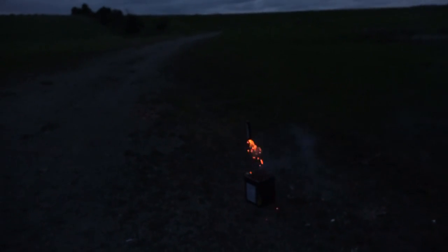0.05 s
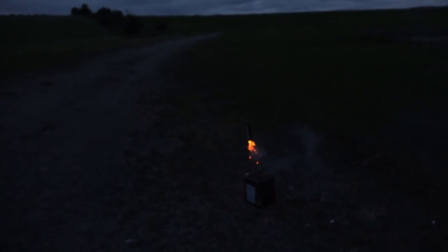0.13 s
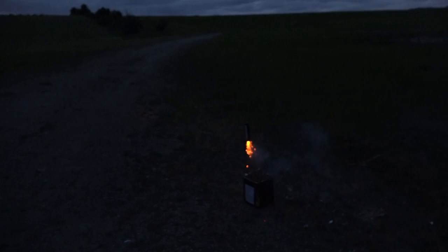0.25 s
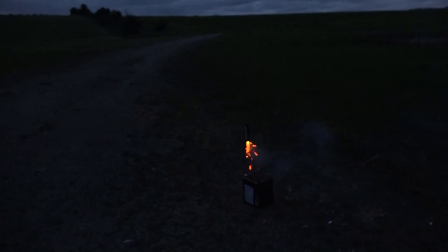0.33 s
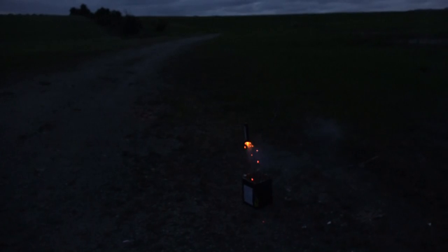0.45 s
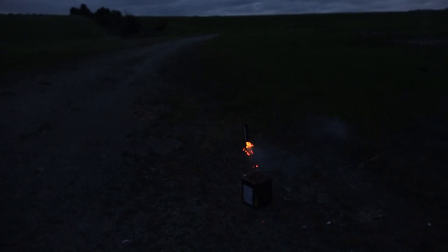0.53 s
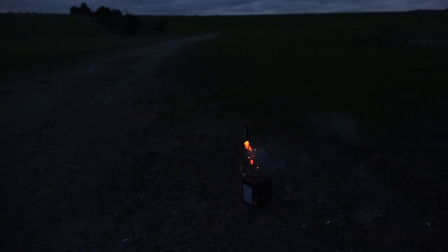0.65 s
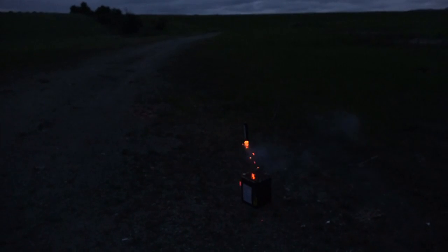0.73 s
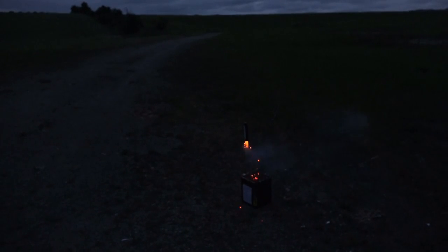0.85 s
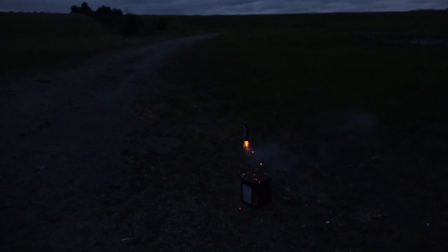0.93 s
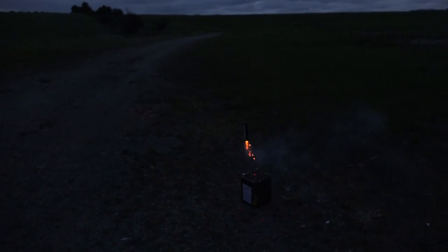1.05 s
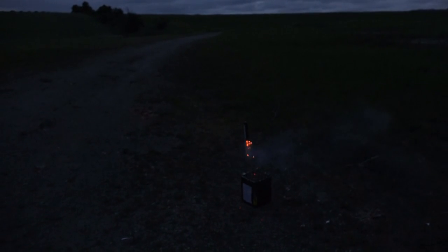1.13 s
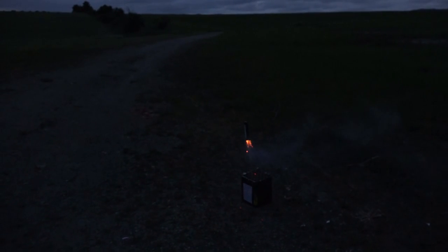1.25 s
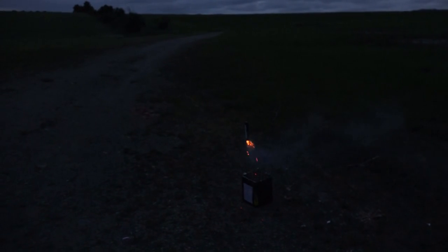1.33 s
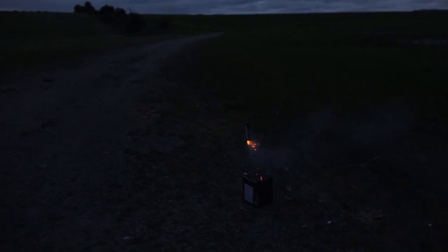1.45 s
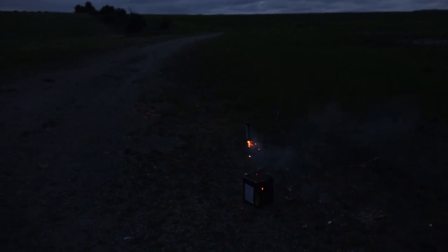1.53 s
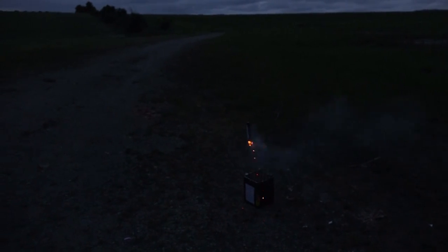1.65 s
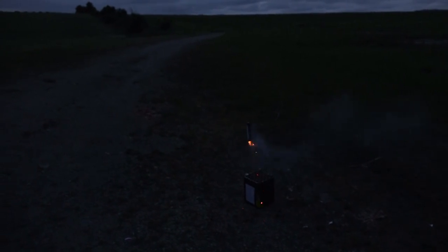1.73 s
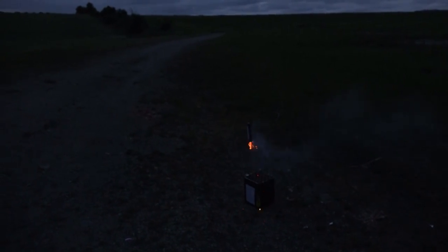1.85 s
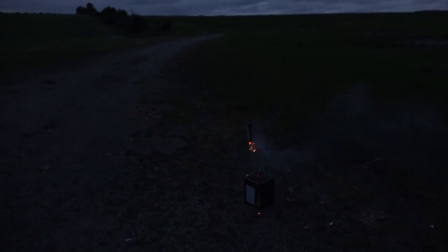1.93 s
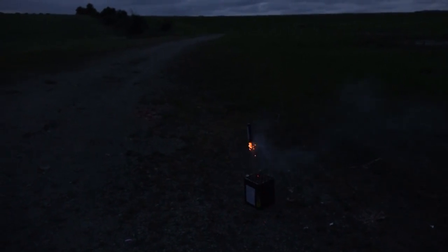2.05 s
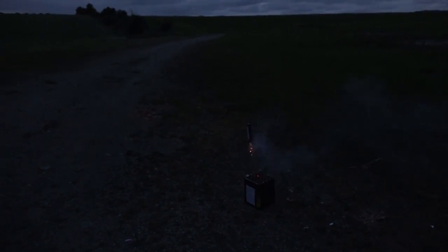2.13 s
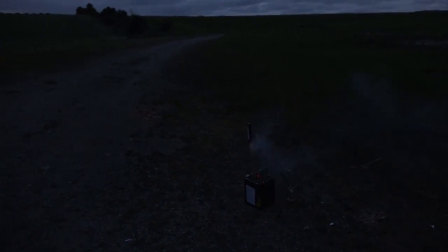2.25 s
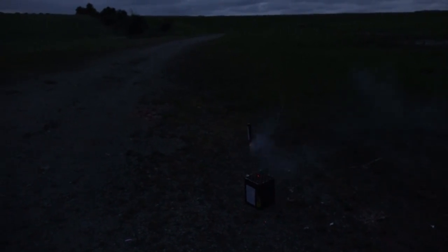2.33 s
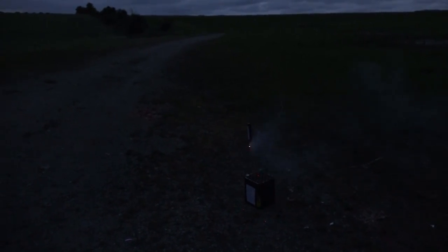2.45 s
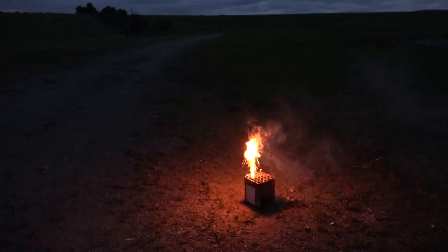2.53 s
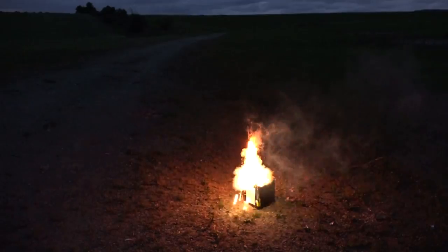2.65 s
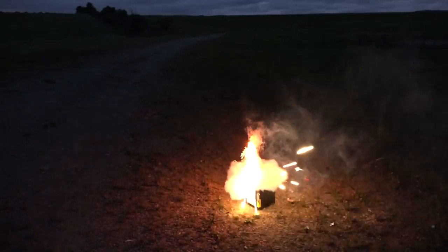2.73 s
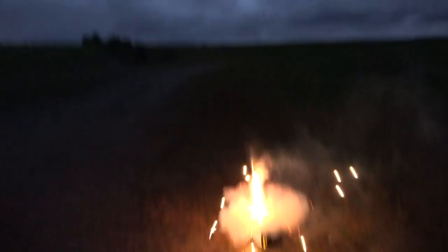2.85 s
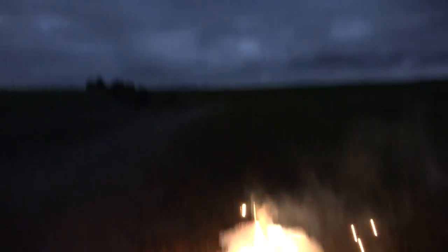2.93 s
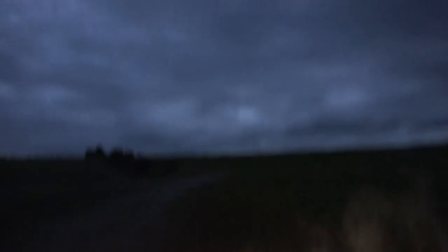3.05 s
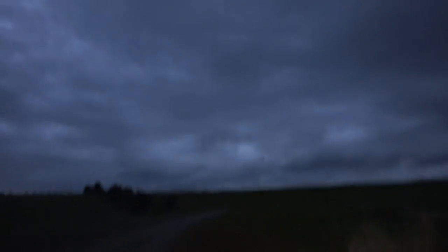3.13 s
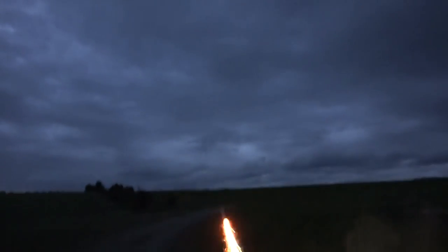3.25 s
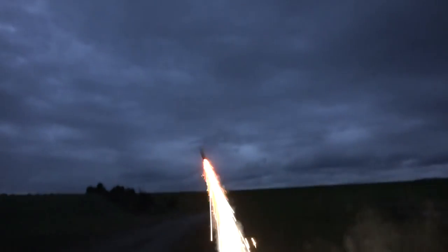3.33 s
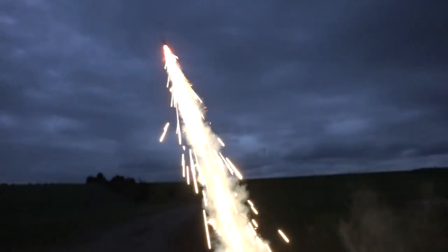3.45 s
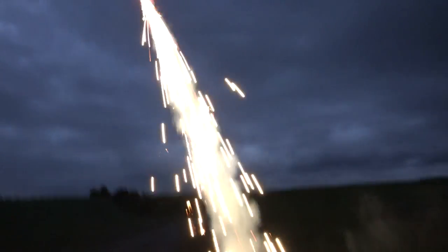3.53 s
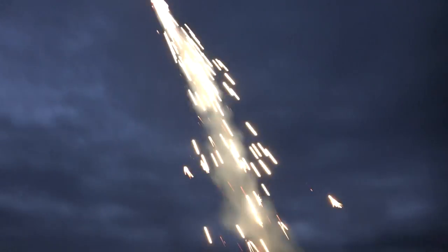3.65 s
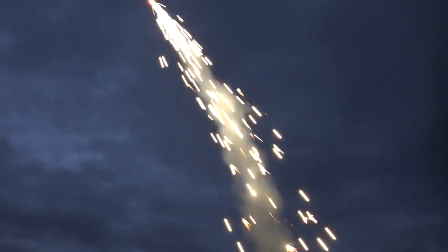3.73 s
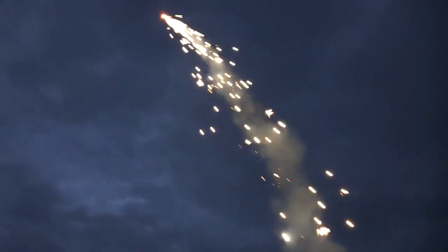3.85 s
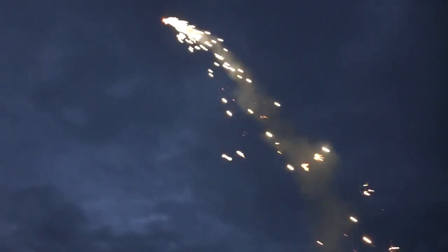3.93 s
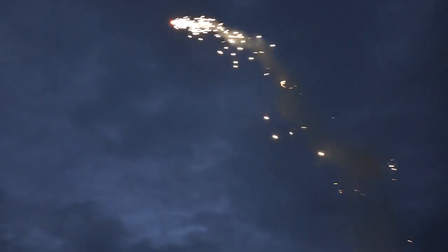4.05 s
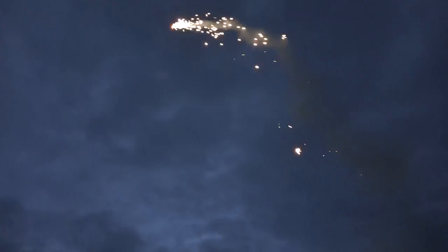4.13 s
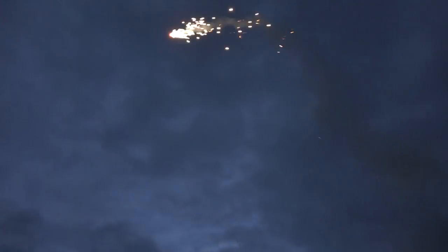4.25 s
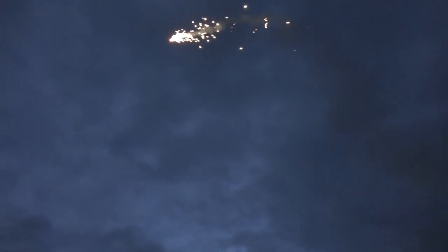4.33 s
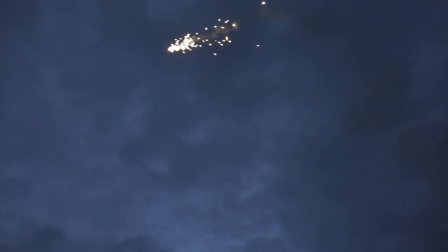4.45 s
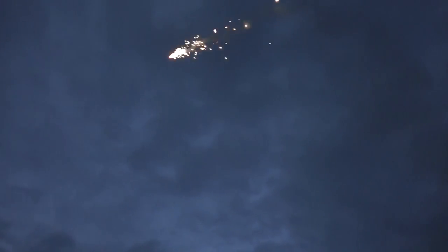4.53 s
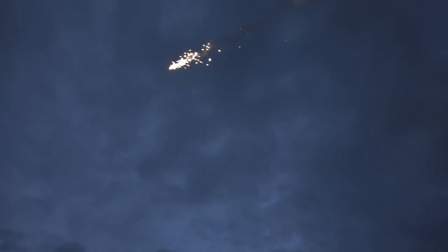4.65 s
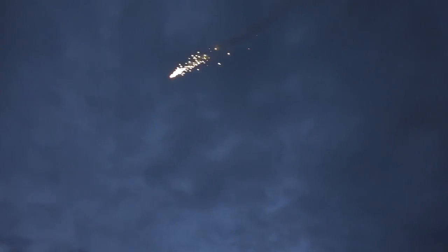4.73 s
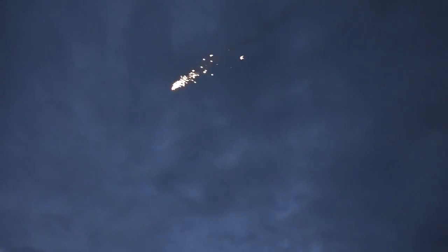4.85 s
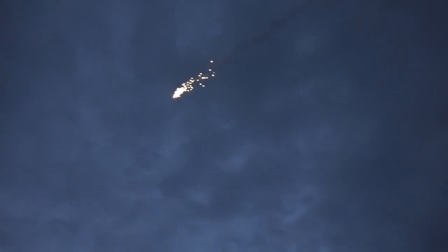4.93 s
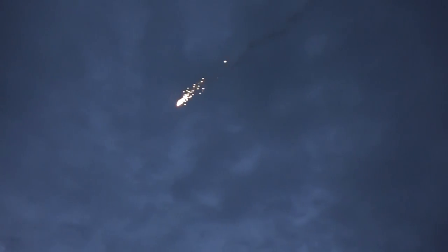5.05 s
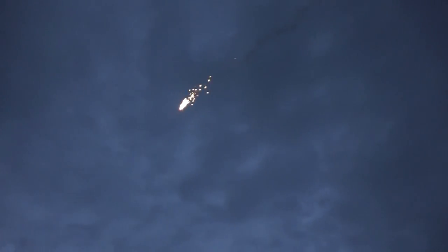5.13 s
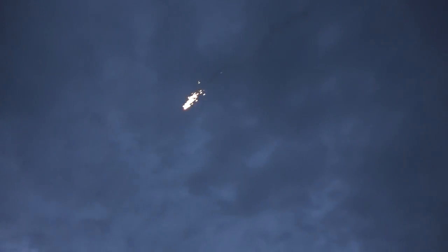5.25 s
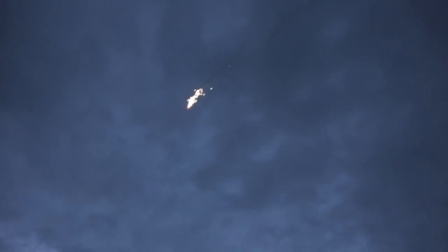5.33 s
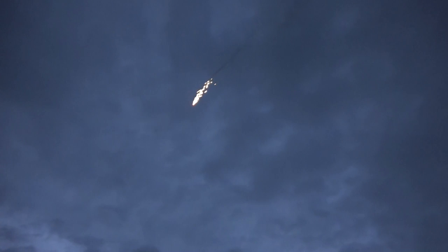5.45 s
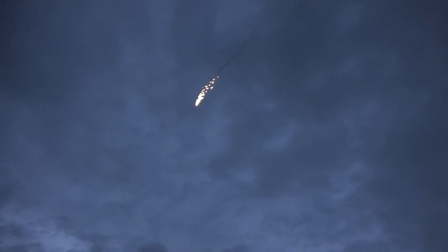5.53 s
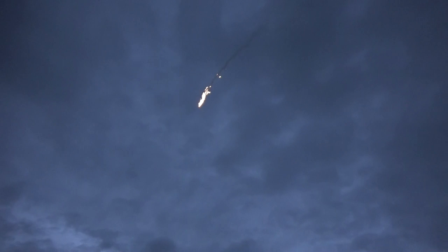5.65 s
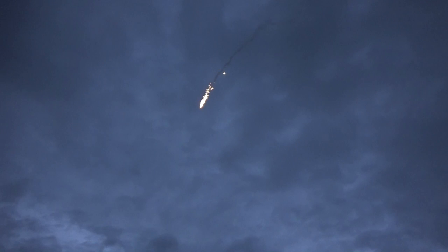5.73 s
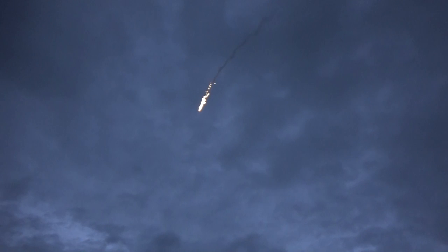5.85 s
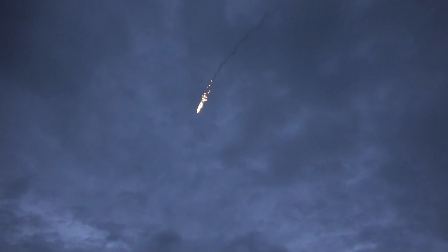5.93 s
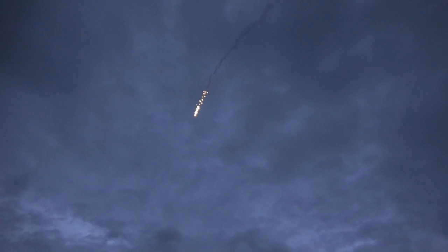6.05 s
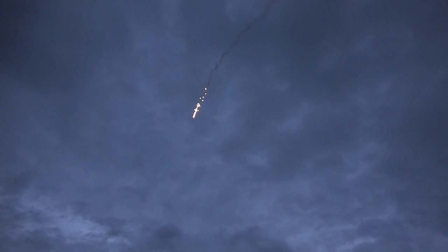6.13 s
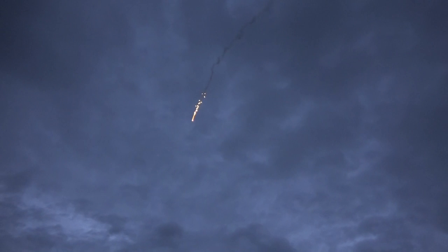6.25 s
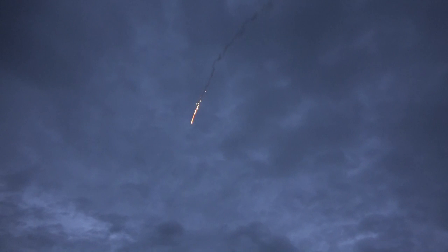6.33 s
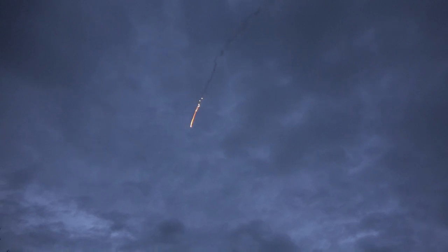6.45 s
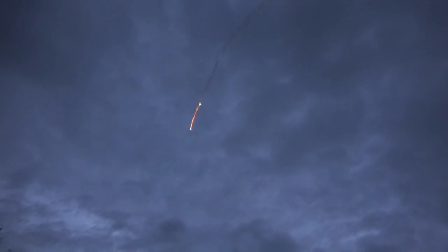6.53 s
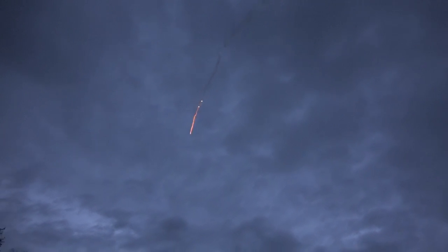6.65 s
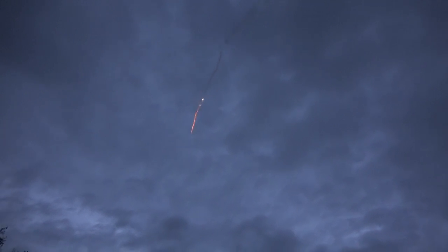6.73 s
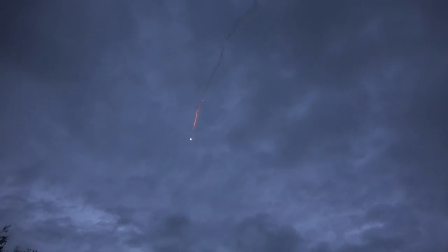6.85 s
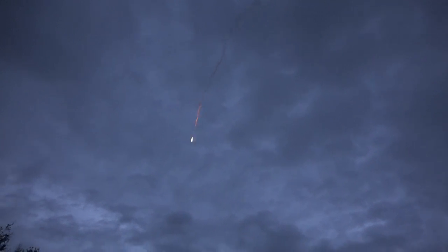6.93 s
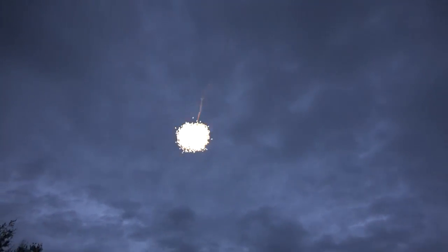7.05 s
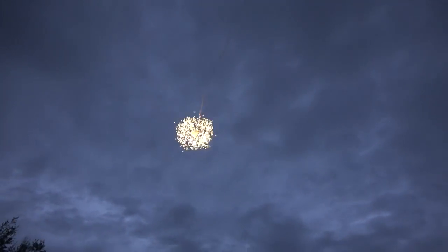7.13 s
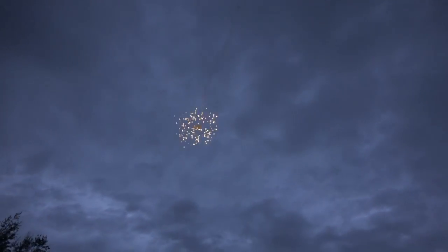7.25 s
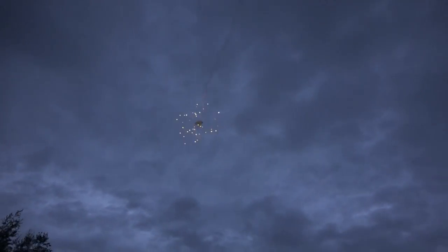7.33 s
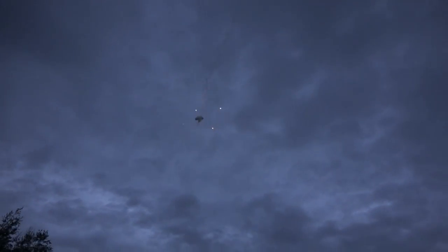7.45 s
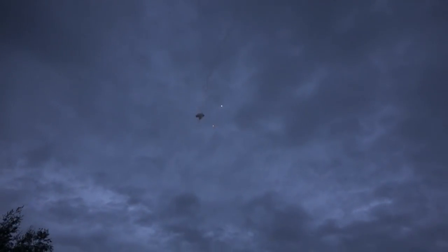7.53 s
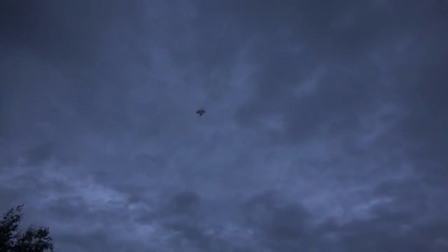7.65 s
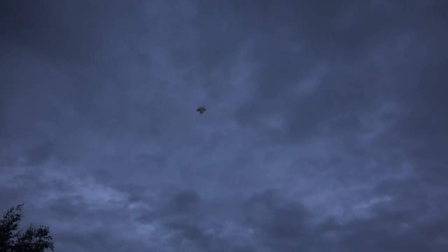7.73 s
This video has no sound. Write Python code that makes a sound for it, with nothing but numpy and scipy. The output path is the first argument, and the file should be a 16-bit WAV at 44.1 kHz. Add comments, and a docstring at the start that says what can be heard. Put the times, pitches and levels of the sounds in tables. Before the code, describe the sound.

From 0 to 2.5 s a nearby fuse hisses and sizzles softly, with small spits and thuds of sparks, over faint low outdoor rumble; it weakens after 1.6 s. At 2.5 s a small puff and a sharper pop ignite the motor, and a very loud, shrill whistle bursts in near 2.9 kHz. It stumbles and drops around 2.9 s as the rocket lifts off, then sinks from about 2.3 kHz to 1.5 kHz by 5.8 s, rasping, fluttering and occasionally cracking to lower notes, with a breathy roar, shifting ground reflection and tree echoes. The rasp dulls with distance. Near 6.2 s the whistle clears, hooks upward and stops. Faint echoes and open air fill the gap until 7.2 s, when a hard, overloading bang cracks, followed by quick echoes and a swelling boom and crash, fading to the end near 8 s.

```python
"""A fuse hisses, sizzles and spits over a quiet field: noise bands under slowly wandering envelopes.
Two gas puffs light the motor; a noisy oscillator whistles, its puffs rasp and filtered noise roars.
The rocket climbs, its ground reflection sweeps a comb, and trees return diffuse, decaying echoes.
The whistle sinks, breaks up at times and ends with an upward hook; then a shell bursts overhead,
as sharp pressure fronts followed by a swelling and slowly dying scatter of boom and crash."""
import sys
import numpy as np
from scipy import signal
from scipy.fft import rfft, irfft, next_fast_len
from scipy.io import wavfile
from scipy.ndimage import uniform_filter1d, map_coordinates

SR = 44100
rng = np.random.default_rng(int(sys.argv[2]) if len(sys.argv) > 2 else 0)


def log_audio(samples):
    """Write samples as a 16-bit WAV file to the path given in sys.argv[1]."""
    # one column per channel
    frames = np.atleast_2d(samples).T
    # limit to full scale, then quantise
    limited = np.clip(frames, -1, 1)
    pcm = np.round(limited * 32767).astype(np.int16)
    wavfile.write(sys.argv[1], SR, pcm)


N = 343980
TIME = np.arange(N) / SR

# Levels in the tables are relative: the stage that uses them may add its own gain.
# low rumble at the microphone: t/s, level/dB
RUMBLE_LEVEL = [(0, -58), (2.5, -57), (3.15, -65.5), (3.25, -50), (3.6, -75), (6.2, -61), (7, -57.5)]
# spectrum of the low rumble of the open air: f/Hz, level/dB
RUMBLE_SPECTRUM = [(12, -29), (20, 3.5), (65, -3.5), (92, 0.5), (123, -5), (230, -9.5), (400, -22),
                   (520, -45), (880, -120)]
# spectrum of the steady background air: f/Hz, level/dB
AIR_SPECTRUM = [(100, -3), (300, -3.5), (1000, -7.5), (3000, -6), (8000, -14.5), (16000, -40.5)]
# course of the fuse: t/s, hiss level/dB, sizzle level/dB
FUSE_LEVELS = [(0, -54, -55.5), (.75, -52.5, -57.5), (1.08, -58, -59), (1.46, -52, -50.5),
               (1.63, -59.5, -60.5), (1.95, -62, -58.5), (2.12, -67, -66.5), (2.5, -61.5, -67)]
# spectrum of the fuse's hiss: f/Hz, level/dB
HISS_SPECTRUM = [(150, -12.5), (600, -11.5), (1400, -8), (2100, -3.5), (2750, -0.5), (3400, -5),
                 (4200, -12.5), (8000, -14), (16000, -31)]
# spectrum of the fuse's sizzle and of the fizzing sparks: f/Hz, level/dB
SIZZLE_SPECTRUM = [(2500, -33.5), (4500, -17.5), (6700, -5), (8500, -3.5), (11000, -8.5), (16000, -7.5)]
# sparks spat by the fuse: t/s, thud level/dB, fizz level/dB
SPARKS = [(.067, -46, -55), (.414, -47, -51), (.534, -56, -49), (.764, -45, -61), (1.124, -47, -66),
          (1.851, -57, -57)]
# likeness of left and right for fuse, ignition and jet: f/Hz, likeness/1
LIKENESS = [(100, 0.95), (1000, 0.98), (2500, 1), (5000, 1), (8000, 0.7), (13000, 0.4)]
# answer of the near trees: f/Hz, T60/s, level/dB
NEAR_TREES_ANSWER = [(200.6, .6, -28), (1609, 0.63, 8), (2940, 0.99, 3.5), (4587, 0.8, 12),
                     (6960, 0.56, 16), (12000, 0.18, 23)]
# answer of the far trees: f/Hz, T60/s, level/dB
FAR_TREES_ANSWER = [(200, 4, -4), (1670, 41, -3), (3000, 2.1, -11), (4420, 2.1, 4), (9170, 1, 0.5)]
# puffs of gas as the motor catches: t/s, level/dB, T60/s, low-pass f/Hz
IGNITION_PUFFS = [(2.506, -28, 0.089, 1480), (2.574, -14, 0.027, 6370)]
# note of the tube, sinking as the fuel burns back, with a hook up at burnout: t/s, f/Hz
TUBE_PITCH = [(2.52, 2780), (2.58, 2930), (2.66, 2920), (2.76, 2845), (2.92, 2630), (2.928, 2450),
              (3.05, 2300), (3.2, 2170), (3.42, 2035), (3.65, 1850), (3.85, 1790), (4.3, 1750), (4.7, 1685),
              (5.2, 1635), (5.78, 1500), (6.16, 1560), (6.21, 1709)]
# state of the flame: t/s, roughness/1, share by which every second puff is weaker/1
FLAME_STATE = [(2.54, .8, .1), (2.62, .5, .1), (2.82, .16, .12), (2.91, .1, .7), (3.07, .36, .4),
               (3.75, .45, .8), (4.5, .48, .3), (5.2, .52, .15), (5.9, .65, .1), (6.03, .25, .12),
               (6.2, .08, .1)]
# the whistle jumps to a lower, rougher note: start t/s, length/s, share of the pitch lost/1
PITCH_SLIPS = [(3.834, 0.043, 0.038), (3.932, 0.027, 0.027), (4.295, 0.046, 0.029), (4.393, 0.081, 0.083),
               (4.527, .105, 0.074), (4.821, 0.13, .045), (5.453, .05, 0.029)]
# the flame stumbles and the whistle breaks up: start t/s, length/s, dip/dB
FLAME_STUMBLES = [(2.912, 0.11, 1.5), (5.003, 0.052, 7.5), (5.083, 0.026, 4), (5.251, .06, 5),
                  (5.351, 0.0797, 3.5), (5.696, 0.079, 3)]
# voices of the motor: t/s, whistle level/dB, rasp level/dB, roar level/dB
VOICE_LEVELS = [(2.58, -9.5, -22, -35), (2.67, -15, -25.5, -57), (2.9, -23.5, -25.5, -43),
                (2.96, -17.5, -21, -39.5), (3.15, -14, -24.5, -39), (3.44, -13.5, -21, -31.5),
                (3.65, -14, -24, -34.5), (4.15, -13, -23, -35.5), (4.5, -11.5, -24.5, -37.5),
                (4.85, -12.5, -21.5, -40), (5.1, -13.5, -26, -41), (6.0, -16.5, -26.5, -45)]
# spectrum of the rasping puffs: f/Hz, level/dB
PUFF_SPECTRUM = [(100, -41), (400, -17.5), (900, -19.5), (1600, -5), (2500, -3), (4000, -7.5), (5400, -4.5),
                 (7400, -1.5), (9000, -5.5), (12000, -7), (16000, -9.5)]
# resonances of the tube: centre/pitch, half-width/pitch, even-puff level/dB, alternating-puff level/dB
TUBE_RESONANCES = [(1.45, .08, -8, 14), (1.95, .09, -3.5, 8.5), (2.5, .08, 5, 1), (2.97, .14, 0.5, -29),
                   (3.25, .14, 8, -24), (3.55, .14, -1.5, 6), (4.52, .15, -9.5, 5.5), (5.5, .2, -10.5, -7)]
# spectrum of the jet nearby, also of the sparks' thud: f/Hz, level/dB
NEAR_ROAR_SPECTRUM = [(30, -29.5), (100, -16), (250, -7), (500, -1.5), (900, 1), (2000, -3), (6000, -72.5)]
# spectrum of the jet from far below: f/Hz, level/dB
FAR_ROAR_SPECTRUM = [(40, -26.5), (80, -17.5), (125, -3.5), (170, -7.5), (230, 3), (350, 1), (550, -8),
                     (900, 3.5), (3000, -54)]
# the burst and its distinct echoes: t/s, level/dB, low-pass f/Hz, left-right level difference/dB
BURST_FRONTS = [(7.2114, 16, 8460, 3), (7.218, 2, 2000, 4), (7.287, 2, 892, -18), (7.492, -7.5, 500, -9),
                (7.778, -20.5, 1200, 22)]
# spectrum of the burst's scattered boom: f/Hz, level/dB
BOOM_SPECTRUM = [(18, -65), (30, -25), (76, -6), (113, 2), (243, 1.5), (389, -4), (468, -11.5), (737, -4.5),
                 (900, -12), (1170, -17), (1980, -120)]
# spectrum of the burst's scattered crash: f/Hz, level/dB
CRASH_SPECTRUM = [(300, -33), (750, -1), (1400, 0.5), (2500, 0), (5000, -4.5), (8000, -9), (12000, -17),
                  (16000, -19.5)]

# flight: ground distance to the pad and heights of nozzle and microphone (m)
PAD_M, NOZZLE_M, MIC_M, SOUND_M_PER_S = 4, .727, 1.5, 343
LIFT_OFF_S, ACCEL_M_PER_S2, TOP_SPEED_M_PER_S = 2.964, 28.5, 20
MIRROR_GRAZING, MIRROR_STEEP = 0.53, 0.2  # amplitude share reflected by grass at low and high angles

# whistle
CATCH_S, ALIGHT_S = IGNITION_PUFFS[0][0], IGNITION_PUFFS[1][0]
KINDLE_DB, KINDLE_DB_PER_S = -15, 120  # level reached just before full burning, and its growth
WARBLE_SHARE, WARBLE_RATE = .015, 40  # rms share of pitch at roughness 1; knots a second
SLIP_ROUGH, STUMBLE_ROUGH = .15, 0.447  # roughness gained
SWITCH_S = .004  # time a slip or stumble takes to set in
SECOND_DB = -20  # second partial during a slip
THIRD_DB, THIRD_GROWS_DB_PER_S = -20, 6.5  # third partial: level towards burnout, and its growth
BURNOUT_S, WHISTLE_FADE_S = 6.225, 0.087

# rasp and jet
SPENT_S, RASP_FADE_DB_PER_S, ROAR_FADE_DB_PER_S = 5.98, 79, 75  # fuel runs low
BEAM_S, BEAM_WIDTH_S, BEAM_DB, BEAM_HZ = 3.35, .16, 5.5, 8000  # treble added as the nozzle faces us
FAR_M = 68  # from here only the deep part of the roar is left

SCATTER_PEAK_S, SCATTER_LATE_T60 = 7.277, 5.0  # peak time and late decay of the burst's scatter
TOP_HZ = 15800  # band limit


def amp(db):
    """A level in decibels corresponds to an amplitude ratio."""
    return 10 ** (np.asarray(db) / 20)


def unit(x):
    """Normalisation divides by the root mean square."""
    return x / np.sqrt(np.mean(np.abs(x) ** 2) + 1e-20)


def along(points, hz):
    """A response is interpolated on a logarithmic frequency axis."""
    f, v = np.transpose(points)
    return np.interp(np.log(hz + 1), np.log(f + 1), v)


def curves(rows):
    """Linear interpolation gives one value per sample for each column after the time."""
    t, *columns = np.transpose(rows)
    return [np.interp(TIME, t, column) for column in columns]


def during(start, end):
    """A gate with 4 ms linear edges."""
    return np.clip(np.minimum(TIME - start, end - TIME) / .004, 0, 1)


def wobble(rate):
    """Interpolated normal deviates make a smooth random curve of rms 1, rate knots a second."""
    knots = rng.standard_normal(SR // 2)
    return unit(map_coordinates(knots, [TIME * rate], mode="wrap"))


def filtered(x, response):
    """Convolution is multiplication by a complex response in the frequency domain."""
    m = next_fast_len(N + SR // 2)
    return irfft(rfft(x, m) * response(np.fft.rfftfreq(m, 1 / SR)), m)[..., :N]


def coloured(x, spectrum):
    """Spectral weighting shapes x, here returned at rms 1."""
    return unit(filtered(x, lambda hz: amp(along(spectrum, hz))))


def spread(pair, alike):
    """The ratio of mid to side sets the correlation of left and right at each frequency."""
    def mid_and_side(hz):
        angle = np.arccos(np.clip(along(alike, hz), -1, 1)) / 2
        return np.array([np.cos(angle), np.sin(angle)])

    mid, side = filtered(pair, mid_and_side)
    return np.array([mid + side, mid - side])


def rush(spectrum, alike, grain_db):
    """Turbulent flow is stereo noise of rms 1, clumped into millisecond grains."""
    clumps = amp(grain_db * wobble(830))
    noise = rng.standard_normal((2, N)) * clumps
    return coloured(spread(noise, alike), spectrum)


def burst(start, t60):
    """An impulsive source jumps at start and decays exponentially, by 60 dB in t60 seconds."""
    return (TIME >= start) * amp(-60 * np.maximum(TIME - start, 0) / t60)


def field_rumble():
    """Low-frequency rumble rises and falls irregularly, swelling briefly near 3.25 s and staying low while the
    motor burns, a little stronger at left."""
    level = curves(RUMBLE_LEVEL)[0] + 1.5 * wobble(8.8)
    return amp(level) * amp([[1.5], [-1.5]]) * rush(RUMBLE_SPECTRUM, [(100, 0.42)], grain_db=-3.0)


def background_air():
    """A stationary noise floor has a constant spectrum and mean level."""
    return amp(-61.5) * rush(AIR_SPECTRUM, [(1000, 0.52)], grain_db=1.5)


def fuse():
    """Unsteady combustion modulates hiss and sizzle; sparks are decaying noise impulses."""
    hiss_db, sizzle_db = curves(FUSE_LEVELS)
    hiss = amp(hiss_db + 3.0 + 0.6 * wobble(16)) * rush(HISS_SPECTRUM, LIKENESS, grain_db=-0.5)
    sizzle = amp(sizzle_db + 2.5 + .9 * wobble(14)) * rush(SIZZLE_SPECTRUM, LIKENESS, grain_db=0.5)
    thud = sum(amp(db) * burst(t, .035) for t, db, _ in SPARKS)
    fizz = sum(amp(db) * burst(t, 0.1) for t, _, db in SPARKS)
    sparks = thud * rush(NEAR_ROAR_SPECTRUM, LIKENESS, grain_db=-1.5)
    sparks = sparks + fizz * rush(SIZZLE_SPECTRUM, LIKENESS, grain_db=7.0)
    return (hiss + sizzle) * during(-1, ALIGHT_S) + sparks


def flight():
    """Drag limits the climb: (direct path/m, ground-reflected path/m, sine of the ground angle)."""
    aloft = np.maximum(TIME - LIFT_OFF_S, 0)
    climb = np.log(np.cosh(ACCEL_M_PER_S2 * aloft / TOP_SPEED_M_PER_S))
    height = NOZZLE_M + TOP_SPEED_M_PER_S ** 2 / ACCEL_M_PER_S2 * climb
    direct = np.hypot(PAD_M, height - MIC_M)
    mirrored = np.hypot(PAD_M, height + MIC_M)
    return direct, mirrored, (height + MIC_M) / mirrored


def off_ground(x):
    """An image source lags more and weakens as the rocket rises; interference sweeps a comb."""
    direct, mirrored, sine = flight()
    strength = np.interp(sine ** 2, [sine[0] ** 2, 1], [MIRROR_GRAZING, MIRROR_STEEP])
    when = np.arange(N) - (mirrored - direct) / SOUND_M_PER_S * SR
    echo = np.array([map_coordinates(side, [when], order=3) for side in x])
    return (x + strength * echo) / np.sqrt(1 + strength ** 2)


def trees(x, answer, rise_s):
    """Diffuse scattering builds up as sound reaches the trees; each frequency has its own decay."""
    noise = rng.standard_normal((2, 4 * SR))
    hz, t, z = signal.stft(noise, SR, nperseg=256)
    t60, db = [along(np.array(answer)[:, [0, k]], hz)[:, None] for k in (1, 2)]
    build_up = 1 - np.exp(-(t / rise_s) ** 2)
    tail = signal.istft(z * amp(db - 60 * t / t60) * build_up, SR, nperseg=256)[1]
    tail = tail / np.linalg.norm(tail[0])
    return signal.fftconvolve(x.mean(axis=0)[None], tail, axes=1)[:, :N]


def ignition():
    """Sudden gas release gives two decaying puffs of noise through a double one-pole low-pass."""
    noise = spread(rng.standard_normal((2, N)), LIKENESS)
    out = np.zeros((2, N))
    for t, db, t60, cutoff_hz in IGNITION_PUFFS:
        gas = unit(filtered(noise, lambda f: 1 / (1 + 1j * f / cutoff_hz) ** 2))
        out += amp(db) * burst(t, t60) * gas
    return out


def spell(start, length):
    """A change of regime is 1 for the length of a slip or stumble, with quick ramps."""
    return np.clip(.5 + np.minimum(TIME - start, start + length - TIME) / SWITCH_S, 0, 1)


def flame():
    """Slips and stumbles disturb the burning: (pitch/Hz, roughness, alternation of the puffs)."""
    rough, alternation = curves(FLAME_STATE)
    lost = sum(share * spell(t, length) for t, length, share in PITCH_SLIPS)
    stumbling = sum(spell(t, length) for t, length, _ in FLAME_STUMBLES)
    rough = np.clip(rough + SLIP_ROUGH * (lost > 0) + STUMBLE_ROUGH * stumbling, 0, .9)
    return curves(TUBE_PITCH)[0] * (1 - lost), rough, alternation


def oscillation(flutter_hz, swell_limit):
    """Turbulence perturbs phase and amplitude of a self-sustained tone; the flame caps its swing."""
    pitch, rough, _ = flame()
    pitch = pitch * (1 + WARBLE_SHARE * rough * wobble(WARBLE_RATE))
    shake = filtered(rng.standard_normal((2, N)), lambda f: 1 / (1 + (f / flutter_hz) ** 3))
    # a steady phasor plus a random one
    swing = np.sqrt(1 - rough ** 2) + rough * unit(shake[0] + 1j * shake[1])
    strength = np.tanh(np.abs(swing) / swell_limit)
    cycles = np.cumsum(pitch) / SR + np.unwrap(np.angle(swing)) / (2 * np.pi)
    return cycles, unit(strength)


def overtones(cycles):
    """Harmonic distortion adds a second partial in slips and a third that grows towards burnout."""
    second = amp(SECOND_DB) * sum(spell(t, length) for t, length, _ in PITCH_SLIPS)
    third = amp(THIRD_DB - THIRD_GROWS_DB_PER_S * np.abs(BURNOUT_S - TIME))
    return second * np.cos(4 * np.pi * cycles) + third * np.cos(6 * np.pi * cycles)


def whistle(cycles, strength, level_db):
    """The oscillating tube radiates its tone, with a subharmonic where successive puffs differ."""
    alternation = flame()[2]
    # uneven puffs sound the octave below, in fits and starts
    undertone = amp(-18 + 2.64 * wobble(70) + 3.14 * wobble(14)) * alternation * np.cos(np.pi * cycles)
    tone = unit(strength * (np.sin(2 * np.pi * cycles) + undertone + overtones(cycles)))
    dips_db = sum(dip * spell(t, length) for t, length, dip in FLAME_STUMBLES)
    tone = amp(level_db - dips_db - 1.23) * tone
    tone = tone * np.clip((BURNOUT_S - TIME) / WHISTLE_FADE_S, 0, 1)
    # stirred air makes it flicker from side to side
    return tone * amp(np.array([[1], [-1]]) * 1.7 * wobble(57))


def puffs(cycles, strength, scatter_db, jitter):
    """Each cycle emits one pulse, alternately strong and weak, less regular in a rough flame."""
    count = np.arange(np.ceil(cycles[0]) + 1, cycles[-1] - 1)
    at = np.interp(count, np.maximum.accumulate(cycles), np.arange(N))
    rough, alternation = [c[at.astype(int)] for c in flame()[1:]]
    chance = rng.standard_normal((len(at), 2))
    size = 1 + np.clip(alternation, 0, 1) * (-1) ** count
    size = size * amp(scatter_db * np.sqrt(np.abs(rough)) * chance[:, 0])
    size = size * np.sqrt(strength[at.astype(int)])
    # level the train over 150 puffs
    size = size / np.sqrt(np.abs(uniform_filter1d(size ** 2, size=150)) + 1e-9)
    at = at + jitter * SR * rough * chance[:, 1]
    # windowed-sinc pulses keep the times between samples
    taps = at.astype(int)[:, None] + np.arange(-7, 9)
    offset = taps - at[:, None]
    kernel = np.sinc(offset) * np.cos(np.pi * offset / 16) ** 2
    return np.bincount(np.clip(taps, 0, N - 1).ravel(), (size[:, None] * kernel).ravel(), N)


def in_tube(x):
    """Resonances colour x and sink with the pitch as the burning fuel leaves the tube longer."""
    hz, t, z = signal.stft(x, SR, nperseg=512)
    multiple = hz[:, None] / np.interp(t, *np.transpose(TUBE_PITCH))
    alternation = np.interp(t, TIME, curves(FLAME_STATE)[1])
    gain = 1
    for centre, width, even_db, alternating_db in TUBE_RESONANCES:
        peak = amp(even_db + (alternating_db - even_db) * alternation)
        gain = gain + peak / (1 + ((multiple - centre) / width) ** 2)
    return signal.istft(z * gain, SR, nperseg=512)[1][:, :N]


def beamed(x):
    """Directivity adds treble while the nozzle swings towards the microphone."""
    facing = np.exp(-((TIME - BEAM_S) / BEAM_WIDTH_S) ** 2)
    treble = filtered(x, lambda hz: 1 - 1 / (1 + (hz / BEAM_HZ) ** 4))
    return x + amp(BEAM_DB) * facing * treble


def through_air(x, metres, loss_db):
    """Absorption takes loss_db a metre at 10 kHz relative to the bass, pivoting near 4.5 kHz."""
    hz, t, z = signal.stft(x, SR, nperseg=256)
    slope = (hz[:, None] / 10000) ** 1.5 - .3
    path = np.interp(t, TIME, metres)
    return signal.istft(z * amp(-loss_db * slope * path), SR, nperseg=256)[1][:, :N]


def rasp(cycles, strength, level_db, metres, spent):
    """Pulses with spurts of turbulent gas excite the tube; air dulls them with distance."""
    rough = flame()[1]
    train = puffs(cycles, strength, scatter_db=2.5, jitter=.000018)
    # each puff leaves gas that dies away with a 0.7 ms time constant
    gas = unit(np.abs(signal.lfilter([1], [1, -np.exp(-1 / (.0007 * SR))], train)))
    spurts = gas * rng.standard_normal((2, N))
    spurts = unit(spread(spurts, [(1000, 1.0), (4000, 0.88), (12000, 0.083)]))
    gassy = amp(2.5 + 3.7 * rough)  # a rough flame spurts more gas
    mixed = (unit(train) + gassy * spurts) / np.hypot(1, gassy)
    tubed = coloured(in_tube(mixed), PUFF_SPECTRUM)
    distant = through_air(beamed(tubed), metres, loss_db=0.337)
    return distant * amp(level_db + 5 - RASP_FADE_DB_PER_S * spent)


def jet_roar(level_db, metres, spent):
    """Jet turbulence is broadband nearby; a power crossfade leaves its deep part at a distance."""
    far = np.clip(metres / FAR_M, 0, 1) ** 2
    near_roar = np.sqrt(1 - far) * rush(NEAR_ROAR_SPECTRUM, LIKENESS, grain_db=0.0)
    far_roar = np.sqrt(far) * rush(FAR_ROAR_SPECTRUM, LIKENESS, grain_db=2.0)
    return (near_roar + far_roar) * amp(level_db + 2.5 - ROAR_FADE_DB_PER_S * spent)


def motor():
    """Whistle and rasp share one oscillation; the roar of the jet superposes on them."""
    whistle_db, rasp_db, roar_db = curves(VOICE_LEVELS)
    spent = np.maximum(TIME - SPENT_S, 0)
    metres = flight()[0]
    cycles, strength = oscillation(flutter_hz=185, swell_limit=1.35)
    voices = whistle(cycles, strength, whistle_db)
    voices = voices + rasp(cycles, strength, rasp_db, metres, spent)
    voices = voices + jet_roar(roar_db, metres, spent)
    # the motor sounds weakly before the fuel is fully alight
    kindling = amp(KINDLE_DB - KINDLE_DB_PER_S * np.abs(ALIGHT_S - TIME)) * during(CATCH_S, ALIGHT_S)
    return voices * (kindling + during(ALIGHT_S, BURNOUT_S))


def bang(push_s, low_hz):
    """A shock front turns to suction; the microphone's bass cut makes it swing back."""
    out = np.zeros((2, N))
    for t, db, cutoff_hz, pan_db in BURST_FRONTS:
        u = np.maximum(TIME - t, 0) / push_s
        pressure = (TIME >= t) * (1 - u) * np.exp(-u)
        shock = signal.lfilter(*signal.butter(1, min(cutoff_hz, SR / 3), fs=SR), pressure)
        out += amp([[db + pan_db / 2], [db - pan_db / 2]]) * shock
    return signal.lfilter(*signal.butter(2, low_hz, "high", fs=SR), out)


def answer_swell(peak_db, rise_s, t60, late_db):
    """Scattered energy builds to a peak as the nearest trees answer; the far ones linger faintly."""
    t = TIME - SCATTER_PEAK_S
    early = amp(peak_db - 60 * np.maximum(-t / rise_s, t / t60))
    late = amp(late_db) * burst(SCATTER_PEAK_S, SCATTER_LATE_T60)
    return np.hypot(early, late) * during(BURST_FRONTS[0][0], np.inf)


def scatter():
    """Countless small echoes of the burst merge into noise; air absorbs more of the later crash."""
    path = SOUND_M_PER_S * np.maximum(TIME - BURST_FRONTS[0][0], 0)
    boom = rush(BOOM_SPECTRUM, [(100, 0.38), (600, .45)], grain_db=1.5)
    boom = boom * answer_swell(peak_db=-15.5, rise_s=0.23, t60=0.58, late_db=-32)
    crash = rush(CRASH_SPECTRUM, [(800, .55), (4000, .2)], grain_db=3)
    crash = through_air(crash, path, loss_db=.055)
    crash = crash * answer_swell(peak_db=-18.0, rise_s=0.21, t60=0.59, late_db=-34)
    return boom + crash


def scene():
    """Linear superposition joins the field, the rocket with its reflections, and the burst."""
    quiet_field = field_rumble() + background_air()
    rocket = off_ground(fuse() + ignition() + motor())
    near_answer = amp(-13) * trees(rocket, NEAR_TREES_ANSWER, rise_s=0.048)
    far_answer = amp(-46) * amp([[2], [-2]]) * trees(rocket, FAR_TREES_ANSWER, rise_s=0.94)
    # the rocket drifts to the left
    lean_db = .9 + 1.5 * np.clip(TIME - 3.2, 0, 1)
    leaning = rocket * amp(np.array([lean_db, -lean_db]) / 2)
    return quiet_field + leaning + near_answer + far_answer + bang(push_s=0.00098, low_hz=150.4) + scatter()


def record(dry):
    """Overload saturates the microphone smoothly; a steep low-pass then limits the band."""
    clipped = dry / (1 + np.abs(dry / .96) ** 8) ** (1 / 8)
    return filtered(clipped, lambda hz: 1 / (1 + (hz / TOP_HZ) ** 160))


dry = scene()
out = record(dry)
log_audio(out)
```